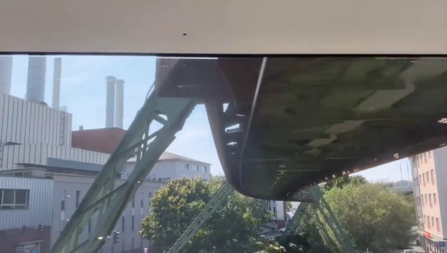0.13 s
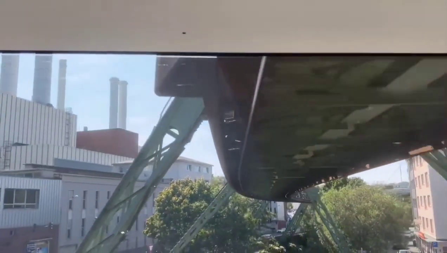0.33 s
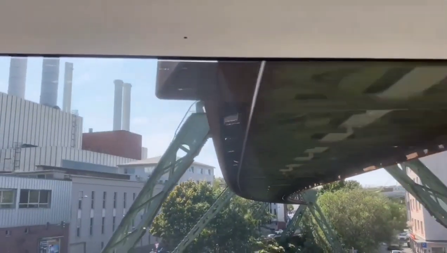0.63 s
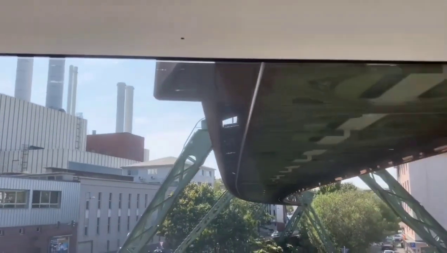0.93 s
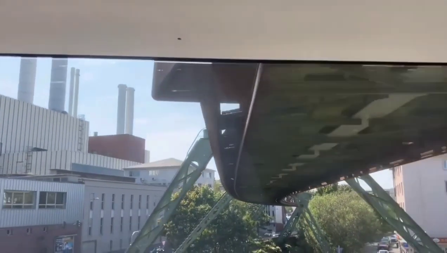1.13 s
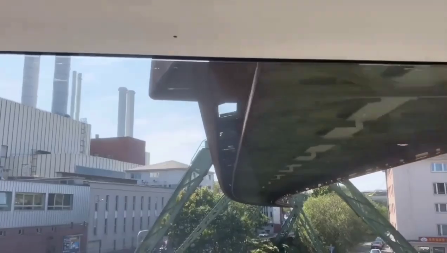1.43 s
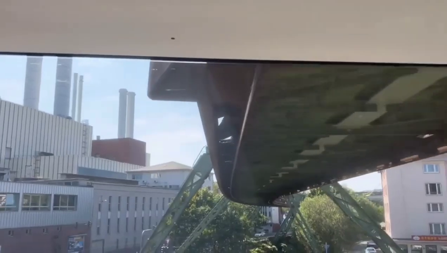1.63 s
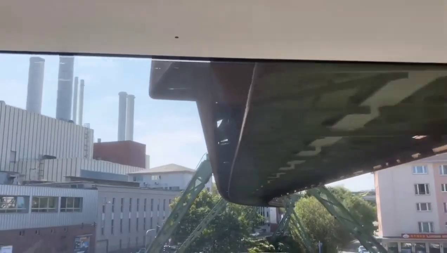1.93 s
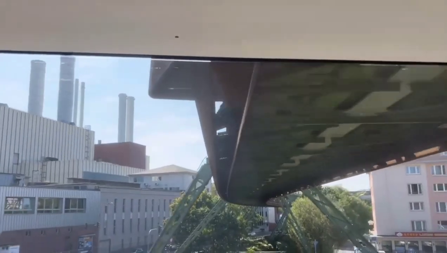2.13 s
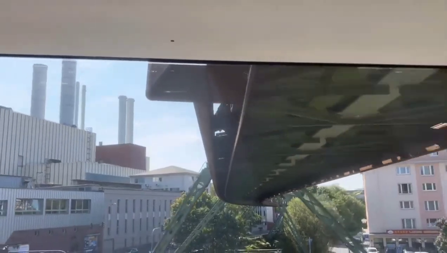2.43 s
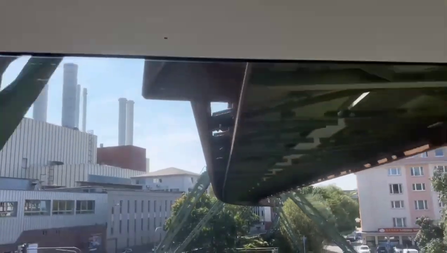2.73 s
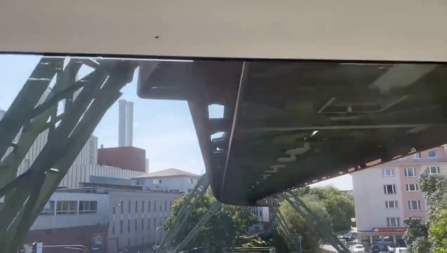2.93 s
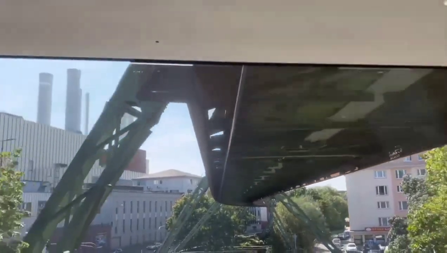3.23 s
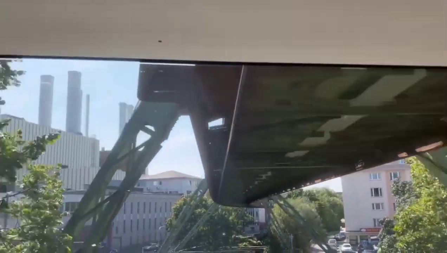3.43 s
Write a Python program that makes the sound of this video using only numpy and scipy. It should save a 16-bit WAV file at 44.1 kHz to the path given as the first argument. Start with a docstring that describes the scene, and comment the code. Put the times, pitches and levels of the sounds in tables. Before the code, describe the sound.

Deep uneven train rumble heard inside the car, with wheel rush, jolting knocks and brief rattles.

```python
"""A deep, uneven rumble and boom fill a suspended train running along its overhead track.
Shaped noise makes the rumble, the wheels' rush and the hiss; wavering sine waves make the boom and the thin whine.
Uneven rail brings thumps and knocks, built from fading tones, with brief moans and groans.
Loose fittings rattle as bursts of tiny ticks, and the treble dips briefly, mostly at the jolts."""
import sys
import numpy as np
from scipy import signal
from scipy.fft import rfft, irfft
from scipy.io import wavfile
from scipy.ndimage import uniform_filter1d

SR = 44100
rng = np.random.default_rng(int(sys.argv[2]) if len(sys.argv) > 2 else 0)


def int16_out(signal):
    """Quantize to a 16-bit WAV file."""
    q = np.round(np.clip(np.atleast_2d(signal).T, -1, 1) * 32767)
    wavfile.write(sys.argv[1], SR, q.astype(np.int16))


N = 158319
T = np.arange(N) / SR  # time of each sample, seconds

# How hard the car body shakes. Each row: time in seconds, shaking level in dB.
SHAKING = [(0, -20.5), (.25, -28.5), (.32, -19.5), (.55, -22.5), (.64, -15), (.9, -23), (1.15, -16),
           (1.42, -26), (1.66, -12), (1.83, -20), (1.93, -23.5), (2.1, -21), (2.27, -16.5), (2.48, -11),
           (2.6, -16.5), (2.98, -25.5), (3.3, -20), (3.59, -25.5)]
SHAKING_REF_DB = -17  # at this shaking level the rumble and rolling noise have their set levels


def amp(db):
    """Turns decibels into a gain."""
    return 10 ** (np.asarray(db) / 20)


def unit(x):
    """Scales a signal to an rms (average strength) of 1."""
    return x / np.sqrt(np.mean(x ** 2) + 1e-20)


def read(points, hz):
    """Reads a table at any frequency, with straight lines on a log-frequency axis."""
    f, value = np.transpose(points)
    return np.interp(np.log(hz + 1), np.log(f + 1), value)


def curve(rows, column=1):
    """Joins one column of a timed table into a value for every sample."""
    rows = np.array(rows)
    return np.interp(T, rows[:, 0], rows[:, column])


def bump(centre_s, width_s):
    """A smooth bell-shaped swell in time, with peak 1."""
    return np.exp(-np.minimum(.5 * ((T - centre_s) / width_s) ** 2, 20))


def sine(turns):
    """A sine wave from its phase, counted in whole turns."""
    return np.sin(2 * np.pi * turns)


def add(mix, start_s, sound):
    """Mixes a sound in from its start time, cut off at the end of the mix."""
    part = mix[:, max(round(start_s * SR), 0):][:, :sound.shape[-1]]
    part += sound[..., :part.shape[1]]


def drift(rate_hz):
    """Random wandering of rms 1; changes much faster than the rate are filtered out."""
    t = np.arange(4096) / 1000
    hz = np.fft.rfftfreq(len(t), t[1])
    spectrum = rfft(rng.standard_normal(len(t))) * np.exp(-(hz / rate_hz) ** 2)
    return unit(np.interp(T, t, irfft(spectrum)))


def pair(z, same):
    """Makes two unrelated channels alike by the given share; negative means opposite."""
    same = np.clip(same, -1, 1)
    right = same * z[0] + np.sqrt(1 - same ** 2) * z[1]
    return np.array([z[0], right])


def colour(x, spectrum):
    """Gives two unrelated channels a spectrum and a stereo width that changes with frequency."""
    # Each row: frequency in Hz, left-right likeness from -1 to 1.
    likeness = [(25, .99), (60, .96), (160, 0.93), (270, 0.39), (440, .5), (720, 0.04), (1200, 0),
                (2000, 0.33), (3200, 0.48), (4700, .5), (5600, -0.07), (7200, 0.97), (8300, 0.36),
                (9200, -1), (10400, -1), (11400, 0), (12000, 1), (14400, 1), (15000, -1)]
    hz = np.fft.rfftfreq(x.shape[1], 1 / SR)
    stereo = pair(rfft(x), read(likeness, hz))
    return unit(irfft(stereo * amp(read(spectrum, hz)), x.shape[1]))


def rush(spectrum, patchy_db):
    """Coloured noise whose strength varies in soft patches of time and frequency."""
    z = signal.stft(rng.standard_normal((2, N)), nperseg=1024, noverlap=768)[2]
    patches = uniform_filter1d(rng.standard_normal(z.shape[1:]), size=6, axis=0)
    patches = unit(uniform_filter1d(patches, size=14, axis=1))
    x = signal.istft(z * amp(patchy_db * patches), nperseg=1024, noverlap=768)[1][:, :N]
    return colour(x, spectrum)


def hiss():
    """A steady, bright rush along the track, made of patchy noise."""
    # Each row: frequency in Hz, relative level in dB per Hz.
    hiss_spectrum = [(1200, -19.5), (2300, -3), (3100, 2.5), (4000, -5), (5000, -5), (6000, -6.5),
                     (8500, -10), (12000, -12.5), (14000, -21), (15200, -25)]
    return rush(hiss_spectrum, patchy_db=1.96) * amp(-49.5)


def rings():
    """Narrow panel and drive resonances that the ride keeps ringing, made of filtered noise."""
    # Each row: frequency in Hz, width in Hz (scaled below), level in dB, left-right likeness.
    resonances = [(161.4, 11, -42, .9), (323.3, 58, -40.5, 0.64), (635, 49, -49, 0.15),
                  (721, 15, -53.5, .2), (1066, 68, -54, .1), (1466, 62, -54.5, 0.11), (1668, 27, -58, 0.54),
                  (1880, 10, -63.5, 0.45), (2110, 33, -68.5, .4), (2798, 110, -55, 0.49),
                  (5540, 60, -72.5, .5)]
    f = np.fft.rfftfreq(N, 1 / SR)
    power = alike = 0
    for hz, width, db, same in resonances:
        shape = unit(1 / (1 + ((f - hz) / (0.71 * width)) ** 2))
        peak = (amp(db) * shape) ** 2
        power = power + peak
        alike = alike + same * peak
    noise = rfft(rng.standard_normal((2, N)))
    return irfft(pair(noise, alike / power) * np.sqrt(power), N)


def drive():
    """The drive's thin whine: a sine with wandering pitch and a flutter partly its own in each ear."""
    # Each row: time in seconds, pitch in Hz, level in dB.
    whine = [(0, 2792, -48.5), (.3, 2787, -50.5), (.65, 2784, -51), (.87, 2790, -47.5), (1.0, 2779, -56),
             (1.2, 2776, -58), (1.65, 2785, -47), (1.75, 2778, -56), (2.0, 2777, -50), (2.1, 2765, -61),
             (2.42, 2770, -64), (2.56, 2791, -46.5), (2.82, 2799, -47.5), (3.0, 2782, -52),
             (3.13, 2768, -49), (3.3, 2762, -48), (3.48, 2782, -47), (3.59, 2795, -52)]
    wander, flutter_db = 0.00264, 3  # wander is a fraction of the pitch
    turns = np.cumsum(curve(whine) * (1 + wander * drift(rate_hz=52.7))) / SR
    flutter = drift(rate_hz=53)  # shared by both ears
    ears = np.array([amp(flutter_db * (flutter + 0.58 * drift(rate_hz=14))) for _ in range(2)])
    return amp(curve(whine, column=2)) * unit(ears * sine(turns))


def wheels():
    """Rolling noise of the wheels, which swells a little with the shaking."""
    # Each row: frequency in Hz, relative level in dB per Hz.
    roll_spectrum = [(82, -40.5), (140, -6), (166, 2), (194, -3), (265, -8.5), (363, -9.5), (491, -16.5),
                     (640, -14.5), (688, -18.5), (805, -18), (897, -22.5), (1060, -23), (1340, -25),
                     (1490, -28.5), (1720, -26.5), (1960, -34), (2500, -47.5), (3250, -65), (5500, -120)]
    level_db, follow = -30.5, 0.23  # follow: dB of change per dB of shaking
    swell_db = follow * (curve(SHAKING) - SHAKING_REF_DB)
    return rush(roll_spectrum, patchy_db=1.5) * amp(level_db + swell_db)


def moans():
    """Brief hollow moans of a wheel on the rail: swelling tones, out of step between the ears."""
    # Each row: time of the peak in seconds, pitch in Hz, level in dB.
    moan_rows = [(.235, 652, -37), (1.13, 648, -35.5), (1.31, 622, -39.5)]
    out = np.zeros((2, N))
    for s, hz, db in moan_rows:
        tone = sine(hz * T + 0.3 * rng.random((2, 1)))
        out += amp(db) * bump(s, width_s=.032) * tone
    return out


def groans():
    """Short groans as the body flexes at jolts: one panel resonance swells and dies."""
    # Each row: time of the peak in seconds, level in dB.
    groan_rows = [(.595, -28.5), (.722, -21.5), (2.214, -27.5), (2.32, -25.5)]
    groan_hz = 325.5
    return sum(amp(db) * bump(s, width_s=.013) * sine(groan_hz * T + rng.random())
               for s, db in groan_rows)


def rattles():
    """Loose fittings chatter: dense ticks with a faint metal ring, blurred by the cabin."""
    # Each row: start in seconds, length in seconds, level in dB, level of the metal ring in dB;
    # both levels are scaled for length below.
    bursts = [(1.56, .27, -44, -68), (1.734, 0.031, -37, -62), (1.991, 0.032, -43.5, -69),
              (2.198, 0.084, -48, -69), (2.347, 0.065, -42, -60), (2.416, 0.06, -41.5, -57)]
    # Each row: frequency in Hz, relative level in dB per Hz.
    tick_spectrum = [(600, 2), (1400, 1), (2100, 2), (3000, -2), (4000, -6), (5500, -10.5), (8500, -17),
                     (12500, -18), (15000, -25)]
    fitting_hz, fitting_width_hz = 4970, 200
    ticks_per_s, spread_db, blur_t60 = 1000, 4.5, .09  # t60: seconds to fade by 60 dB
    out, t = np.zeros((2, N)), T[:SR // 3]
    hz = np.fft.rfftfreq(len(t), 1 / SR)
    peak = 1 / (1 + ((hz - fitting_hz) / fitting_width_hz) ** 2)
    for s, length, db, ring_db in bursts:
        swell = np.sqrt(np.abs(sine(np.minimum(t / length, 1) / 2)))
        hits = rng.random(len(t)) < ticks_per_s / SR
        ticks = hits * swell * amp(spread_db * rng.standard_normal(len(t)))
        cabin = rng.standard_normal((2, len(t))) * amp(-60 * t / blur_t60)
        blur = signal.fftconvolve(ticks[None], cabin, axes=1)[:, :len(t)]
        ring = unit(irfft(rfft(blur) * peak, len(t)))
        burst = amp(db) * colour(blur, tick_spectrum) + amp(ring_db) * ring
        add(out, s, np.sqrt(length / t[-1]) * burst)
    return out


def dips():
    """Gain of the treble: it drops for a moment, mostly as the car jolts."""
    # Each entry: middle of a dip in seconds.
    dip_times = [.608, .635, .656, 1.052, 1.099, 1.192, 1.376, 1.422, 1.562, 2.165, 2.189, 2.283, 2.328,
                 2.35, 2.492, 2.655, 3.142, 3.21, 3.397]
    depth_db = -9.5  # one dip alone; overlapping dips add up
    return amp(depth_db * sum(bump(s, width_s=.0039) for s in dip_times))


def knocks():
    """Wheels strike uneven rail: the body rings in fading tones with a dull noise clatter."""
    # Each row: start in seconds, level of the upper tones in dB, level of the lowest tone in dB,
    # level of the clatter in dB (before it is doubled below).
    strikes = [(.574, -26, -13, -49), (0.707, -32, -25, -48), (2.187, -25.5, -33, -44),
               (2.238, -20, -21.5, -26.5), (2.358, -21, -19.5, -22.5), (2.451, -26, -14.5, -46),
               (2.545, -30, -20.5, -36.5), (3.078, -32.5, -15.5, -64)]
    # Upper tones of the body. Each row: frequency in Hz, relative level in dB,
    # time to fade by 60 dB in seconds.
    body_tones = [(198.6, -0.5, 0.25), (260.4, 1.5, 0.18), (298.9, -2, 0.42), (321, 0, 0.24),
                  (359, -2.5, 0.21), (411, -3, 0.11), (536, -10.5, 0.12)]
    # Each row: frequency in Hz, relative level in dB per Hz.
    clatter_spectrum = [(100, 2.5), (270, 11), (380, -12.5), (480, 4.5), (590, -13), (700, -3),
                        (780, -15.5), (845, -0.5), (950, -12.5), (1120, -10), (1350, -19.5), (3000, -41),
                        (8000, -60)]
    low_hz, low_t60, clatter_t60 = 164.6, 0.23, 0.3  # t60: seconds to fade by 60 dB
    out, t = np.zeros((2, N)), T[:SR // 2]
    tone_rise = np.minimum(t / .011, 1)
    clatter_rise = np.minimum(t / .0082, 1)
    for s, db, low_db, clatter_db in strikes:
        tones = amp(low_db - 60 * t / low_t60) * sine(low_hz * t)
        for hz, level, t60 in body_tones:
            phase = rng.random() + 0.34 * rng.random((2, 1))  # differs a little between the ears
            tones = tones + amp(db + level - 60 * t / t60) * sine(hz * t + phase)
        noise = colour(rng.standard_normal((2, len(t))), clatter_spectrum)
        clatter = amp(clatter_db - 60 * t / clatter_t60) * noise
        add(out, s, tone_rise * tones + 2 * clatter_rise * clatter)
    return out


def car_body():
    """The shaken body: broad noise rumble, the boom of its main resonance, and suspension thumps."""
    # Each row: frequency in Hz, relative level in dB per Hz.
    rumble_spectrum = [(13, -24), (25, -12), (39, -11.5), (53, -9.5), (66, -.5), (81, -4.5), (105, -5),
                       (121, -9.5), (141, -23), (221, -46), (610, -91)]
    # The boom builds up on rough stretches. Each row: time in seconds, level in dB.
    boom_levels = [(0, -38), (1.45, -29), (1.58, -16.5), (1.83, -17), (1.92, -36), (2.09, -27),
                   (2.125, -13.5), (2.27, -7.3), (2.4, -8.3), (2.52, -11.5), (2.58, -23), (2.8, -34),
                   (3.59, -38)]
    # Low thumps of the suspension. Each row: time of the peak in seconds, peak level in dB.
    thump_rows = [(0.026, -13), (0.615, -9), (1.163, -8), (1.376, -11.5), (1.561, -9), (1.68, -13),
                  (2.655, -10.5), (3.131, -12.5), (3.209, -11.5), (3.396, -11)]
    rumble_db, follow = -17.5, 0.81  # follow: dB of change per dB of shaking
    boom_hz, boom_wander, boom_flutter_db = 64.17, 0.02, 0.7  # wander is a fraction of the pitch
    thump_hz = 59.7

    noise = rush(rumble_spectrum, patchy_db=2.5)
    # Even out the noise's own swells so that the shaking sets the level.
    noise = noise / np.sqrt(uniform_filter1d((noise ** 2).mean(0), size=7000))
    rumble = noise * amp(rumble_db + follow * (curve(SHAKING) - SHAKING_REF_DB))

    turns = np.cumsum(boom_hz * (1 + boom_wander * drift(rate_hz=12.1))) / SR
    boom_db = curve(boom_levels) + boom_flutter_db * drift(rate_hz=16)
    boom = unit(sine(turns)) * amp(boom_db)

    thumps = sum(amp(db) * bump(s, width_s=.012) * np.cos(2 * np.pi * thump_hz * (T - s))
                 for s, db in thump_rows)
    return rumble + boom + thumps


def scene():
    """Everything heard in the cabin, a little louder on the left."""
    treble = (hiss() + drive() + rattles()) * dips()
    mix = treble + rings() + wheels() + moans() + groans() + knocks() + car_body()
    balance_db = 1.0  # left minus right
    return mix * amp([[balance_db / 2], [-balance_db / 2]])


def record(dry):
    """Softly rounds off the loudest peaks, fades both ends and removes the highest treble."""
    edge_hz, fade_s = 15200, .004
    x = dry / (1 + (dry / .95) ** 8) ** (1 / 8)
    x = x * np.minimum(np.minimum(T, T[-1] - T) / fade_s, 1)
    low_pass = signal.firwin(511, edge_hz, window=("kaiser", 9), fs=SR)
    return signal.oaconvolve(x, low_pass[None], "same")


dry = scene()
out = record(dry)
int16_out(out)
```